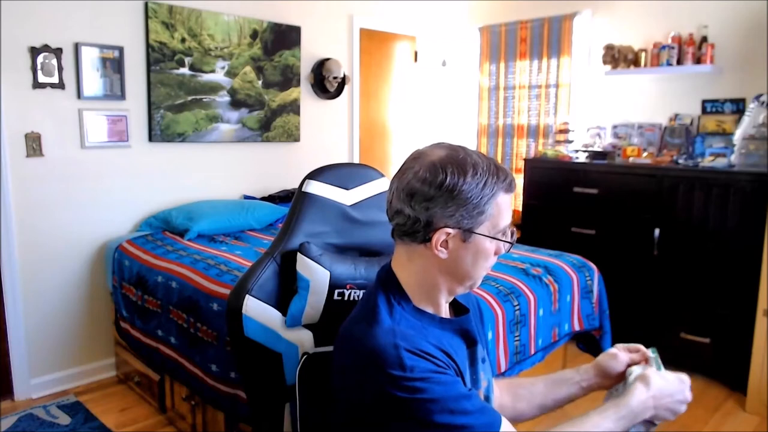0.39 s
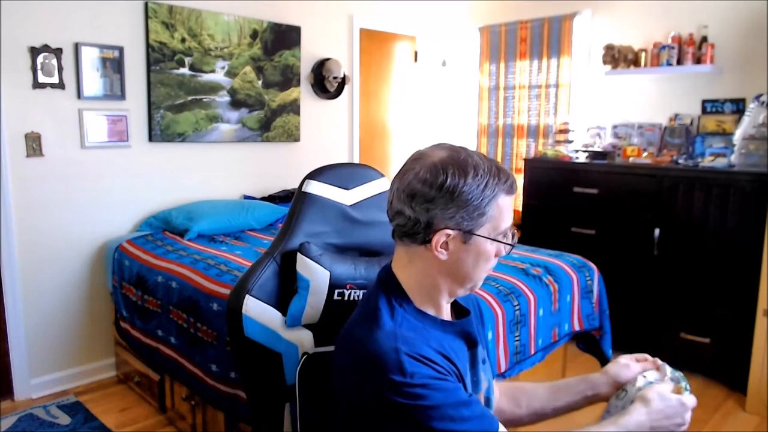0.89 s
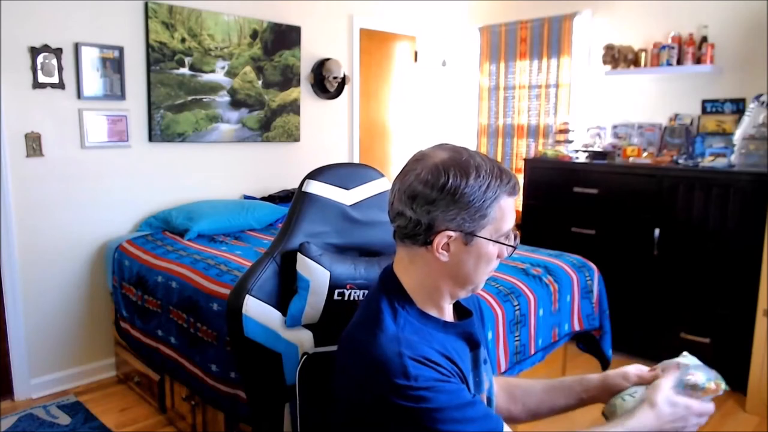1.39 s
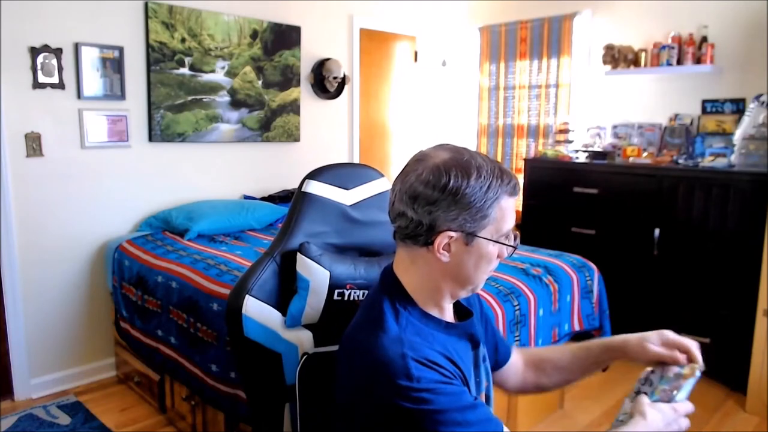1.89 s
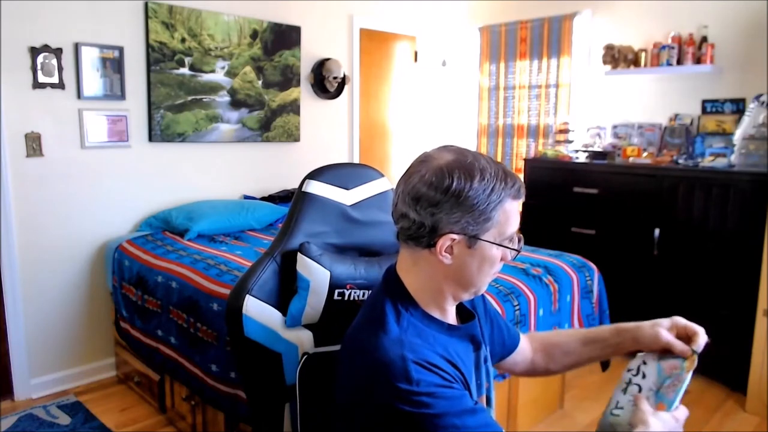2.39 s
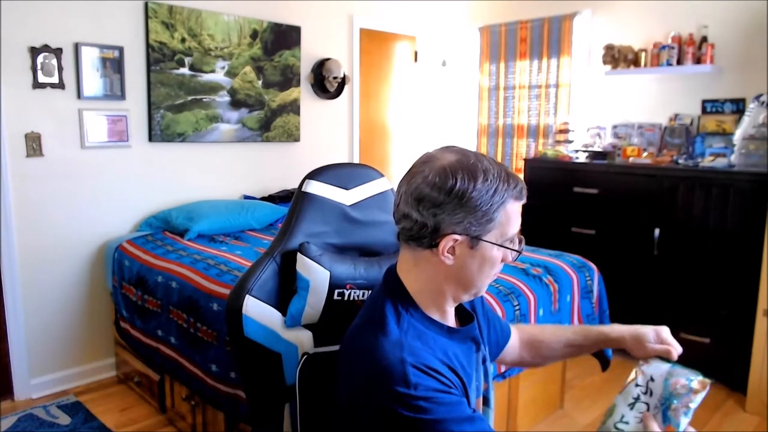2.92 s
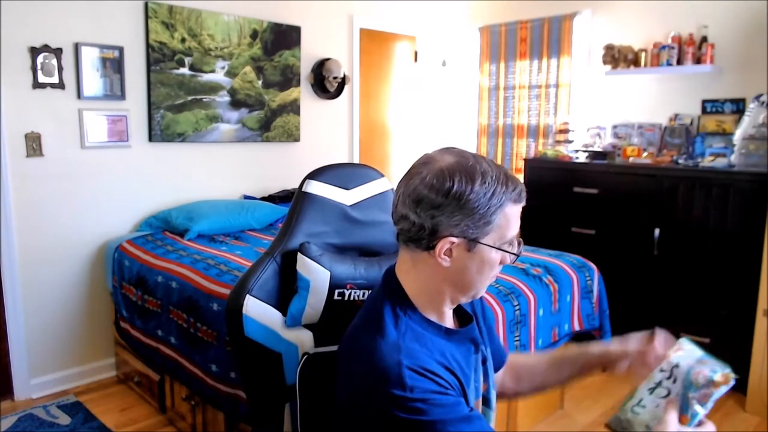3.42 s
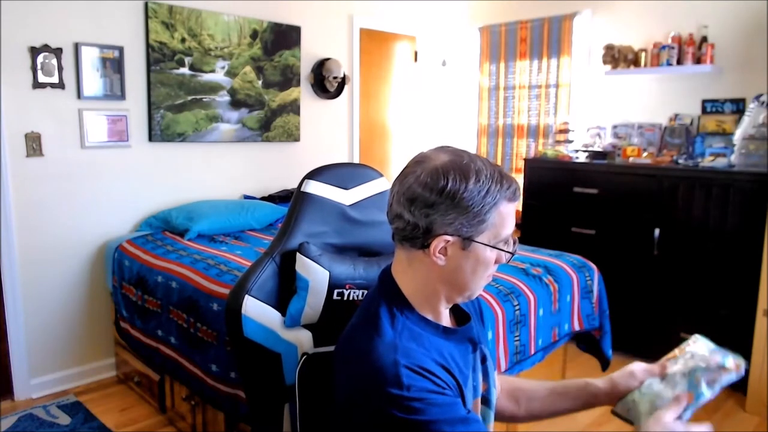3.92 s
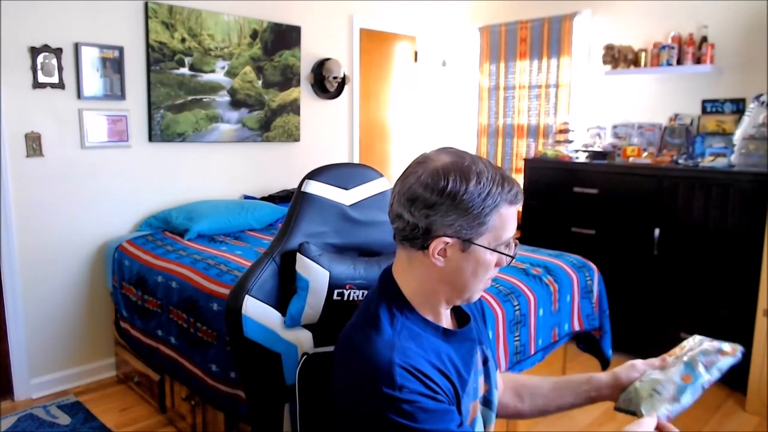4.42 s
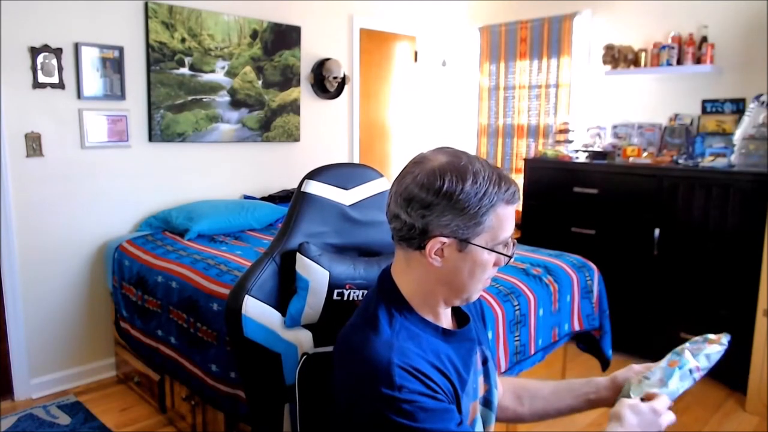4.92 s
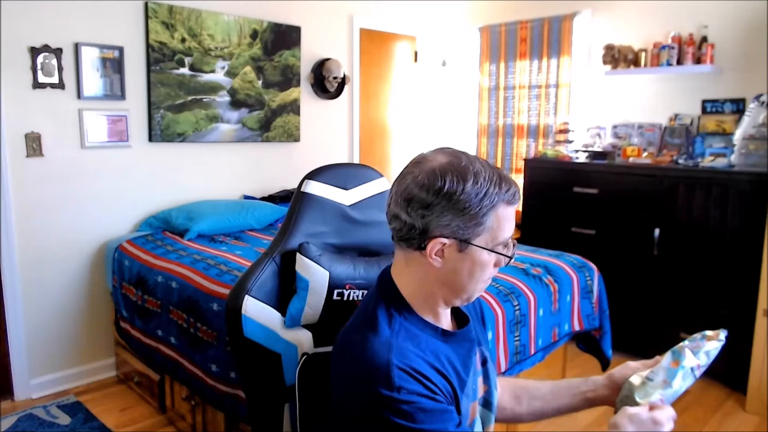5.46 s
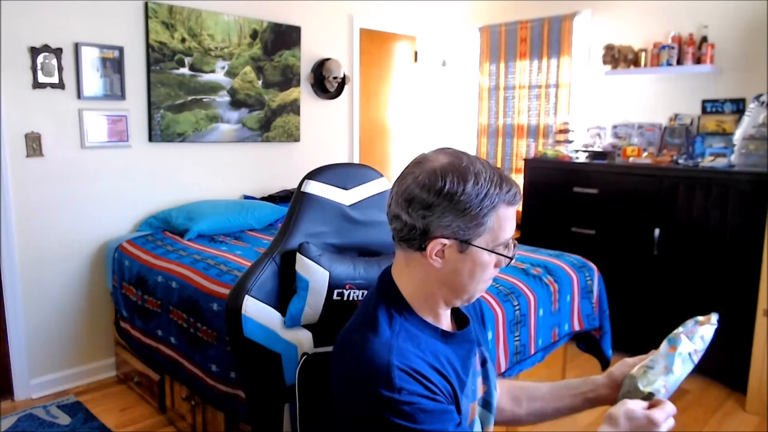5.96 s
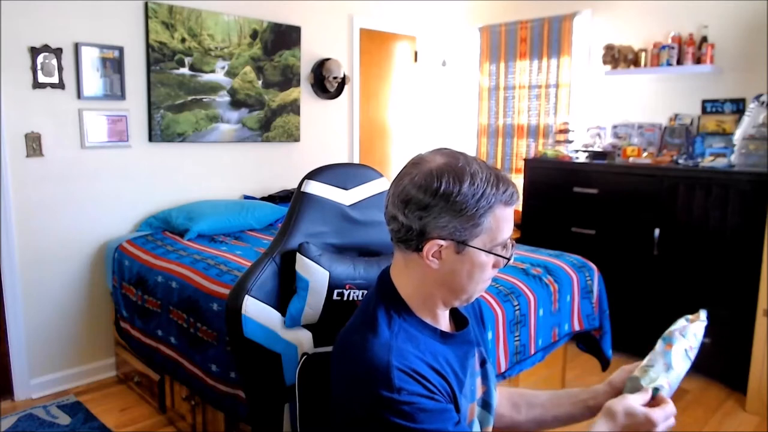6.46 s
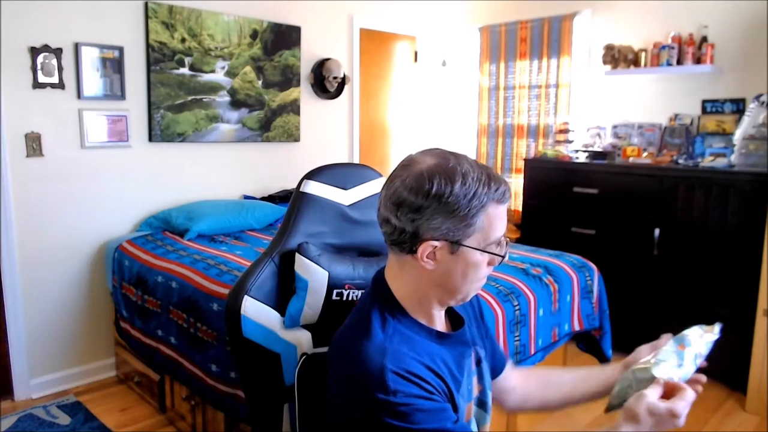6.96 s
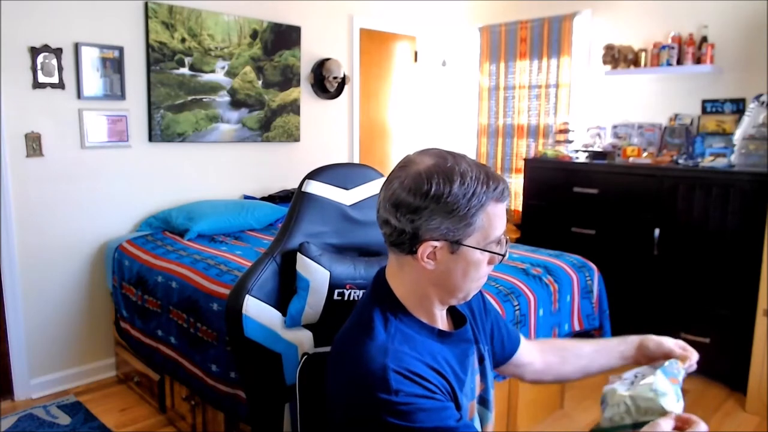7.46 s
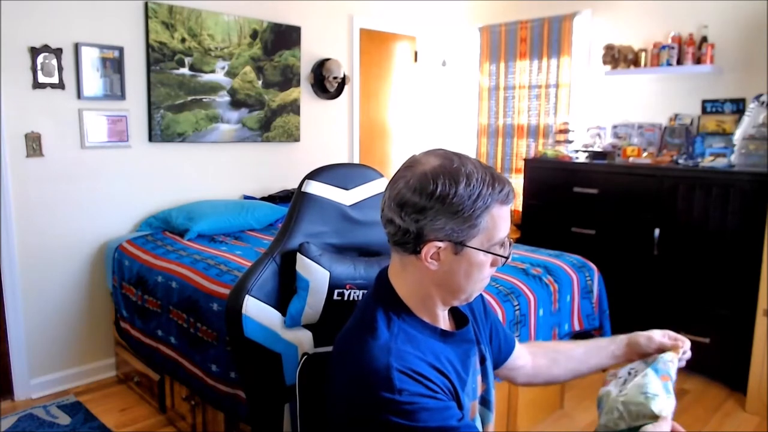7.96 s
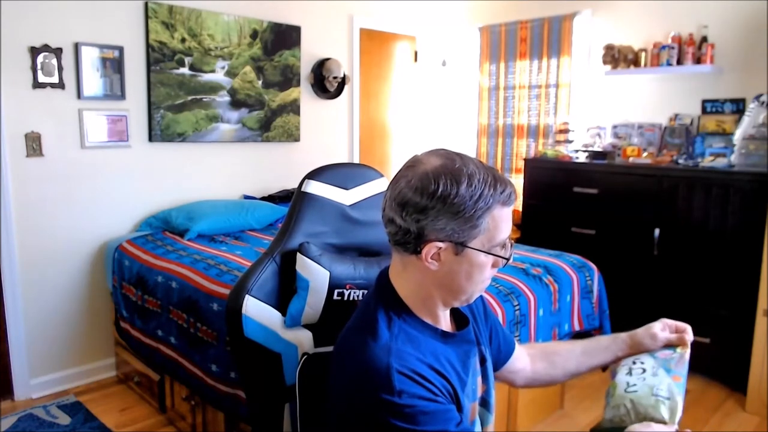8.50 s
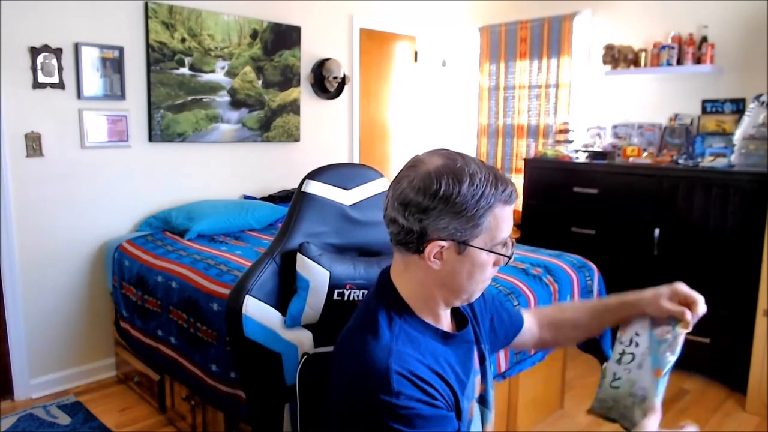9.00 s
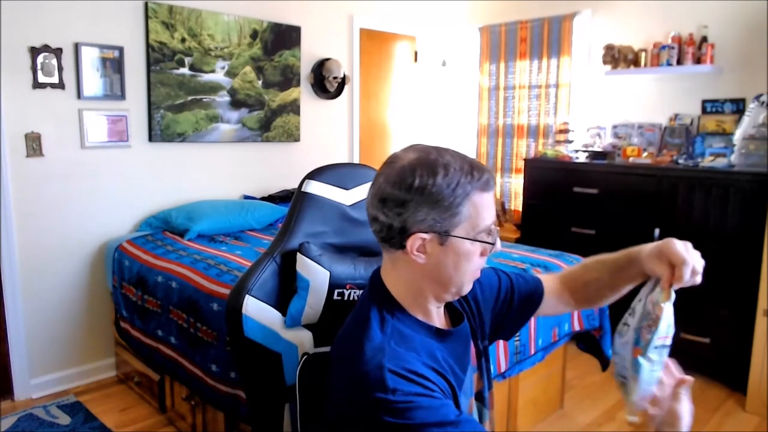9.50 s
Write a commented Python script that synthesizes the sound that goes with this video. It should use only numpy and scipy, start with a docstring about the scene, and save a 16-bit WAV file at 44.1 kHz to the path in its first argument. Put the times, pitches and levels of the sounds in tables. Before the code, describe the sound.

Hands squeeze and turn a crinkly plastic-foil bag in a small bedroom, loud crisp pops standing out of continuous fine crackling.

```python
"""Sealed foil snack bag, kneaded and turned by hands at arm's length from one microphone, small furnished bedroom.
Each buckling crease is a noise burst of a few milliseconds that rings its own patch of foil.
Big snaps stand out of a swarm of small creases, which swells with each squeeze of the fingers.
Behind them the room answers with early echoes and a short tail.
A noise suppressor fades whatever is faint, the bass first; both channels carry the same sound."""
import sys
import numpy as np
from scipy import signal
from scipy.fft import rfft, irfft
from scipy.io import wavfile
from scipy.ndimage import uniform_filter1d

SR = 44100
rng = np.random.default_rng(int(sys.argv[2]) if len(sys.argv) > 2 else 0)


def voltage_ratio(decibels):
    """Convert decibels (scalar or array-like) to amplitude ratios, 20 dB per decade."""
    exponent = np.asarray(decibels, float) / 20
    return 10 ** exponent


def store_wav(level_fs):
    """Save 16-bit WAV to argv[1]."""
    pcm = np.round(np.clip(np.atleast_2d(level_fs), -1, 1) * 32767)
    wavfile.write(sys.argv[1], SR, pcm.T.astype(np.int16))


N = 424241  # samples in the scene

# Big creases buckling close to the microphone, before the colour of the foil:
# (t/s, nominal peak level/dB, ring of the foil patch f/Hz,
#  nominal bass level re peak/dB, nominal treble level re peak/dB)
BIG_CREASES = [(0.02, -21, 832, -21, -36), (0.057, -8, 810, -30.5, -15), (0.146, -15.5, 4930, -53, -1),
               (0.244, -7.5, 3800, -38, -19), (0.273, -12, 800, -22, -52), (0.37, -9, 4000, -28, -21),
               (0.462, -19.5, 2000, -25, -2), (0.537, -9.5, 894, -27.5, -12),
               (0.594, -12, 1940, -21, -11.5), (0.786, -9, 680, -30, -21), (0.793, -20, 2470, -28, -25),
               (0.833, -8.5, 829, -26.5, -24), (0.908, -20.5, 1930, -37, -45),
               (0.943, -26.5, 2280, -44, -36), (0.957, -5.5, 780, -33.5, -39),
               (0.982, -8.5, 1140, -37, -34), (1.016, -10, 1120, -20, -32), (1.03, -3.5, 820, -29.5, -25),
               (1.084, -11.5, 1210, -47, -46), (1.16, -6, 3310, -27, -19.5), (1.236, -4, 5500, -26, -7),
               (1.267, -8, 7270, -30, -25), (1.319, -11.5, 1230, -24, -28), (1.441, -17.5, 1950, -13, -16),
               (1.571, -17, 832, -20, -21), (1.621, -12.5, 1420, -26, -35), (1.632, -9, 1790, -30, -22),
               (1.67, -12, 1520, -28, -35), (1.766, -16, 790, -30.5, -25), (1.815, -17.5, 8900, -42, -14),
               (1.879, -17, 3350, -35, -12), (1.909, -13, 1290, -33.5, -25.5), (2.002, -18, 1130, -27, -26),
               (2.036, -7, 1310, -41.5, -15), (2.068, -15.5, 3660, -21, -13.5),
               (2.132, -16.5, 740, -18.5, -19), (2.163, -11.5, 3000, -30, -18), (2.189, -9, 3700, -25, -35),
               (2.229, -1.5, 1220, -20, -36), (2.244, -5, 600, -18.5, -27), (2.312, -9, 3320, -11.5, -50),
               (2.333, -3, 4370, -33, -39), (2.352, -15, 895, -45, -8), (2.447, -10.5, 850, -29, -42),
               (2.458, -3.5, 2150, -40.5, -24), (2.478, -3.5, 3140, -39, -13.5),
               (2.573, -11.5, 1860, -40, -12), (2.604, -8, 2640, -35, -27.5), (2.763, -22, 1980, -26, -4.5),
               (2.796, -8, 1950, -35.5, -33), (2.876, -16.5, 4860, -9, -30), (2.89, -0.5, 826, -25, -17),
               (2.921, -5.5, 883, -33, -37.5), (3.021, -1.5, 3000, -25.5, -22.5),
               (3.09, -11.5, 850, -22.5, -65.5), (3.11, -19, 1370, -18.5, -27),
               (3.122, -22, 1000, -20, -44), (3.218, -23, 3000, -43, -31), (3.236, -8.5, 3000, -56, -25),
               (3.252, -9, 6820, -85, -22), (3.278, -12.5, 3030, -30, -47), (3.309, -7, 2980, -35, -17.5),
               (3.395, -15, 2500, -33.5, -47), (3.419, -14, 1960, -36, -27),
               (3.477, -6, 1710, -36.5, -24.5), (3.511, -16, 4500, -40, -34), (3.606, -13, 1420, -28, -23),
               (3.618, -11, 1860, -66, -29), (3.679, -14.5, 770, -30, -41), (3.706, -9.5, 2650, -38, -21),
               (3.727, -23.5, 2920, -13, -5), (3.771, -1.5, 1200, -49, -37.5), (3.969, -34, 2200, -40, -28),
               (3.988, -9.5, 1560, -41, -37), (4.039, -21, 3000, -19, -29), (4.047, -15.5, 2000, -28, -37),
               (4.077, -13, 850, -33, -26), (4.089, -12.5, 850, -35.5, -19), (4.2, -23, 2910, -52, -25),
               (4.219, -28, 1500, -45, -30), (4.296, -12.5, 1840, -30, -17), (4.41, -20, 3060, -40, -30),
               (4.46, -10.5, 7000, -77, -11), (4.563, -8, 3000, -37, -15), (4.657, -18, 2680, -43, -12),
               (4.667, -10, 2840, -33, -11), (4.875, -15.5, 1540, -58, -53),
               (4.894, -7.5, 4700, -70, -16.5), (5.001, -9, 1080, -34.5, -33),
               (5.064, -7.5, 1520, -39, -33), (5.087, -18, 3000, -28, -22), (5.132, -19, 7600, -28, -6),
               (5.184, -11.5, 2960, -30.5, -23), (5.236, -6, 3050, -101, -32), (5.28, -14, 3380, -48, -24),
               (5.348, -18.5, 6680, -52, -11), (5.364, -14, 1380, -75, -15), (5.449, -17, 3100, -32.5, -16),
               (5.486, -4, 2000, -36, -21), (5.574, -2.5, 1430, -49, -20.5),
               (5.649, -12, 800, -32.5, -65.5), (5.725, -20, 3170, -38, -18),
               (5.768, -12.5, 1250, -32, -25), (5.835, -13, 2020, -24, -38.5), (5.931, -13, 1480, -24, -34),
               (5.949, -12, 1950, -26, -16), (5.994, -3, 1680, -32, -25.5), (6.232, -11, 3730, -38, -10),
               (6.271, -21, 1980, -56, -6), (6.293, -17, 3530, -60, -13), (6.41, -21.5, 1120, -51, -31),
               (6.501, -17, 2260, -36, -49), (6.547, -10.5, 5260, -66, -9), (6.644, -7, 3400, -28, -12),
               (6.682, -7.5, 1900, -62, -24), (6.755, -15, 1500, -29, -23), (6.787, -12.5, 1500, -38, -37),
               (6.826, -9.5, 1810, -32, -45), (6.841, -6.5, 1700, -33, -23.5), (6.914, -10, 1930, -32, -21),
               (7.079, -22, 1200, -22, -49), (7.129, -10.5, 6500, -55, -21), (7.135, -9.5, 2040, -27, -18),
               (7.238, -12.5, 1600, -25, -26.5), (7.29, -18.5, 1540, -34, -49),
               (7.382, -19.5, 1060, -19, -39), (7.411, -16, 1110, -18, -23), (7.424, -20, 3500, -35, -13),
               (7.469, -13, 4000, -42, -10.5), (7.542, -18.5, 1390, -45, -22), (7.593, -12, 2380, -60, -15),
               (7.666, -15.5, 1370, -33, -27), (7.794, -16, 4150, -78, -17),
               (7.808, -10.5, 1800, -101, -16), (7.83, -12.5, 8200, -77, -3), (7.835, -10, 4470, -60, -51),
               (7.908, -9, 6370, -29, -18), (7.938, -6, 1840, -31, -38), (7.998, -12.5, 1910, -31.5, -19),
               (8.014, -10, 960, -29, -22.5), (8.129, -17.5, 1840, -47, -47), (8.169, -14, 824, -27, -32),
               (8.189, -15, 1250, -25, -26), (8.241, -12, 1130, -37, -47), (8.27, -6, 3350, -70, -23),
               (8.411, -5.5, 960, -42, -31), (8.435, -5.5, 2660, -52, -31), (8.467, -9, 1240, -45, -37),
               (8.561, -8.5, 1180, -25.5, -42), (8.659, -10.5, 1270, -31, -23),
               (8.685, -17.5, 1690, -29, -48), (8.765, -16, 3340, -64, -14), (8.782, -17.5, 3260, -35, -14),
               (8.834, -10.5, 2260, -33, -31), (8.849, -9.5, 1380, -38, -57), (8.882, -10, 1190, -31, -39),
               (8.89, -14, 4000, -43, -31), (8.91, -5.5, 1180, -39, -11.5), (8.918, -3, 1360, -71, -33),
               (9.015, -10.5, 1470, -54, -49), (9.03, -21, 1420, -60, -19), (9.085, -15.5, 3200, -61, -13),
               (9.099, -16, 5220, -59, -21), (9.121, -16.5, 2160, -51, -51), (9.295, -37, 9000, -41, -2),
               (9.358, -26, 1780, -25, -20), (9.38, -17.5, 3000, -47, -30), (9.388, -16, 5400, -56, -8),
               (9.464, -20, 2680, -71, -23), (9.543, -20, 6290, -61, -25), (9.561, -23, 1190, -45, -37)]


def snaps():
    """The big creases, each sounding about a millisecond after its listed time; small bright patches snap
    quicker, a full belly of air makes them deeper."""
    lag_numerator, lag_denominator = 0.35, 343
    plain_bass_db, plain_treble_db = -27.5, -25.5  # re peak, for a crease in flat foil
    snap_ms, log_spread = 2.4, 0.25  # time scale at a 2 kHz ring, scatter of its logarithm
    s, db, ring_hz, bass_db, treble_db = np.transpose(BIG_CREASES)
    luck = np.exp(log_spread * rng.standard_normal(len(s)))
    length_ms = snap_ms * (2000 / ring_hz) ** 0.3 * luck
    sounding_s = s + lag_numerator / lag_denominator
    belly_db = bass_db - plain_bass_db
    crisp_db = treble_db - plain_treble_db
    return creases(sounding_s, db, length_ms, ring_hz, belly_db, crisp_db, ring_db=8, patchy_db=4.5)


def swarm():
    """Small creases at random moments: many faint, a few strong, going off in avalanches."""
    creases_per_s = 700
    count = int(creases_per_s * N / SR)
    luck = rng.random((count, 4))
    s = luck[:, 0] * (N - 1) / SR
    db, belly_db, crisp_db = kneading(s)
    # a light touch gives lone ticks, full force an even crush
    uneven = np.clip(1.4 - (db + 42) / 25, 0.6, 1.4)
    size_db = uneven * np.minimum(-3.8 * np.log(1 - luck[:, 1]), 11)
    # avalanches of 25 ms share a patch of foil, its approximate ring and its strength
    avalanche = rng.random((400, 2))[(s * 40).astype(int)]
    db = db + 7.7 * (avalanche[:, 0] - 0.5)
    ring_hz = 700 * 2 ** (2.46 * avalanche[:, 1] + luck[:, 3])
    length_ms = 0.46 + 3.2 * luck[:, 2] ** 3
    return creases(s, db + size_db, length_ms, ring_hz, belly_db, crisp_db, ring_db=6.5, patchy_db=2.0)


# Squeezes of the fingers on the bag:
# (t of full force/s, nominal peak level of the faintest creases/dB, t held/s, belly level/dB)
FINGER_SQUEEZES = [(0.0, -29, 0.006, 1), (0.161, -23, 0.06, -1), (0.24, -19, 0.025, -14),
                   (0.39, -24, 0.014, -18), (0.46, -30.5, 0.021, -2), (0.55, -24.5, 0.073, -10.5),
                   (0.7, -28, 0.086, -3), (0.8, -30, 0.018, -21), (0.987, -16.5, 0.02, -8),
                   (1.165, -29, .04, -7), (1.232, -21.5, 0.079, -7), (1.6, -39, 0.033, -8),
                   (1.85, -33, 0.048, 1), (2.238, -16, 0.0086, -5), (2.46, -34.5, 0.2, -0.5),
                   (2.78, -21.5, 0.046, -11), (2.885, -19, 0.0088, 2), (3.03, -30, 0.076, -9),
                   (3.24, -47.5, 0.19, 27), (3.6, -33, 0.12, -3), (3.751, -28.5, 0.12, -1),
                   (4.08, -34.5, 0.0062, -5), (4.3, -36, 0.009, -5), (4.46, -31, 0.0087, -4),
                   (4.657, -35, 0.0054, -1), (4.88, -39, 0.056, -12), (5.015, -32, 0.063, -18),
                   (5.2, -30, 0.054, -3), (5.49, -38, 0.49, -7), (5.96, -36, 0.06, -27),
                   (6.228, -40.5, 0.054, 2), (6.663, -20.5, 0.02, -6), (6.83, -26.5, 0.068, -12),
                   (7.14, -34.5, 0.044, 1), (7.42, -36.5, 0.066, -17), (7.83, -37, 0.2, 2.5),
                   (7.95, -35, 0.026, -19), (8.143, -28.5, 0.069, 5), (8.28, -21.5, 0.036, -1.5),
                   (8.43, -25, 0.097, -3.5), (8.67, -35, 0.012, -4), (8.85, -32, 0.095, -1),
                   (9.05, -38.5, 0.1, -14), (9.291, -42.5, 0.023, -29), (9.365, -36.5, 0.011, -1),
                   (9.48, -40, 0.031, -19), (9.53, -37.5, 0.018, 4)]
# The bag resting in the hands: (t/s, nominal peak level of the faintest creases/dB)
RESTING_GRIP = [(0, -46.5), (1.4, -30.5), (2.1, -40.5), (3.4, -41), (4.2, -43), (5.3, -40.5), (6.1, -46.5),
                (6.5, -34), (7.0, -41.5), (7.6, -42.5), (8.1, -42.5), (9.1, -48), (9.17, -68), (9.23, -77),
                (9.33, -70), (9.62, -55)]


def kneading(s):
    """Level, belly and crispness at moments s: squeezes build fast, hold and let go over the resting grip."""
    rise_db_per_s, release_db_per_s = 450, 120.5
    slack_belly_db = -4  # slack foil has little belly
    crisp_db_per_db = 0.0246  # firmer force is crisper
    full, peak_db, held, belly_db = np.transpose(FINGER_SQUEEZES)[:, :, None]
    building_s = np.maximum(full - s, 0)
    released_s = np.maximum(s - full - held, 0)
    db = peak_db - rise_db_per_s * building_s - release_db_per_s * released_s
    grip_db = np.interp(s, *np.transpose(RESTING_GRIP))
    power, rest = voltage_ratio(db) ** 2, voltage_ratio(grip_db) ** 2
    total = power.sum(axis=0) + rest
    level_db = 10 * np.log10(total)
    mean_belly_db = ((power * belly_db).sum(axis=0) + rest * slack_belly_db) / total
    crisp_db = crisp_db_per_db * (level_db - grip_db) + 7.5
    return level_db, mean_belly_db, crisp_db


def creases(s, db, length_ms, ring_hz, belly_db, crisp_db, ring_db, patchy_db):
    """One noise burst a crease, ringing its own patch of foil: rows (toward the microphone, toward the walls)."""
    grain = 1024  # samples a burst
    belly_low_hz = 126  # a boost by the air in the bag fades out below this
    x = np.arange(grain) / SR * 1000 / length_ms[:, None]
    hz = np.fft.rfftfreq(grain, 1 / SR)
    luck = rng.standard_normal((len(s), grain + 16))
    shape = np.sqrt(x) * (np.exp(-2.2 * x ** 2) + 0.5 * np.exp(-x))
    shape = shape + 1.3 * np.exp(-x / 0.08)  # the crease gives way with a needle-sharp tick

    low = 1 / (1 + (hz / 650) ** 4)
    # a soft, dull buckle loses its treble from lower down
    edge_hz = 8500 * voltage_ratio(0.4 * np.minimum(crisp_db + 12, 0))[:, None]
    high = 1 / (1 + (edge_hz / (hz + 1)) ** 4)

    # chance peaks and dips along the spectrum, different for each patch
    place = np.sqrt(hz / hz[-1]) * 16 - np.arange(16)[:, None]
    peaks = luck[:, :16] @ np.exp(-0.5 * place ** 2 / 0.084)
    patch = causal(patchy_db * peaks * (1 - low))
    octaves_off = np.log2((hz + 1) / ring_hz[:, None])
    ring = causal(ring_db * np.exp(-0.5 * (octaves_off / 0.2) ** 2))
    belly = belly_db[:, None]
    belly_limit = 1.5 + (belly > 0) * (belly_low_hz / (hz + 1)) ** 4
    tone = causal(np.minimum(belly, 30) * low / belly_limit + crisp_db[:, None] * high)

    burst = rfft(luck[:, 16:] * shape)
    # a sudden buckle spreads its energy evenly, so the ring of the patch stands out
    spread = uniform_filter1d(np.abs(burst), size=9, axis=1)
    burst = burst * np.sqrt(spread.mean(axis=1, keepdims=True) / spread) * ring
    # the level is set on the burst without its treble
    loud = np.abs(irfft(burst * patch * (1 - high))).max(axis=1)
    # the walls hear the crease from all sides, which evens out its chance peaks
    strength = np.sqrt((shape ** 2).sum(axis=1, keepdims=True))
    sign = np.sign(luck[:, -1:])
    around = strength * sign * np.sqrt(patch) * np.sqrt(ring)
    gain = tone * (voltage_ratio(db) / loud)[:, None]
    waves = irfft(np.stack([burst * patch, around], axis=1) * gain[:, None])
    out = np.zeros((2, N + grain))
    for start, wave in zip((s * SR).astype(int), waves):
        out[:, start:start + grain] += wave
    return out[:, :N]


# Colour that the foil gives every crease: (f/Hz, level/dB)
FOIL_COLOUR = [(25, -5), (100, -9.5), (160, -7.5), (500, -4), (850, -2.5), (7300, -6.5), (11000, -15),
               (15000, -20.5), (16500, -50)]


def foil(bursts):
    """The foil filters all creases alike, with a minimum-phase response."""
    hz = np.fft.rfftfreq(4096, 1 / SR)
    colour = irfft(causal(on_hz(FOIL_COLOUR, hz)))
    return signal.fftconvolve(bursts, colour[None], axes=1)[:, :N]


# Low modes of the bedroom: (nominal f/Hz, nominal level re tail/dB)
BEDROOM_MODES = [(168, -19.5), (375, -17), (540, -24), (680, -25), (820, -17), (880, -23), (1170, -18.5)]
# Echoes of the nearest walls: (nominal t late/s, level/dB)
WALL_ECHOES = [(.008, -19), (.017, -21)]
# Time in which the tail falls by 60 dB: (f/Hz, t/s)
DECAY_TIMES = [(200, 0.19), (3000, 0.26), (15000, 0.22)]


def room():
    """Echoes of the first walls, then a diffuse tail that favours a few low modes, each met with new strength."""
    tail_db, tilt_db = -28.5, -0.5  # level of the tail, its slope an octave above 2 kHz
    mode_drift = 0.04  # scatter of each mode's pitch as the bag moves, as a share
    t = np.arange(int(0.4 * SR)) / SR
    hz = np.fft.rfftfreq(len(t), 1 / SR)
    air = rfft(rng.standard_normal(len(t)))
    tail = 0
    for centre in 100 * 2. ** np.arange(8):
        band = np.clip(1 - np.abs(np.log2(np.maximum(hz, 1) / centre)), 0, 1)
        start_db = tilt_db * max(np.log2(centre / 2000), 0)
        decay_db = 60 * t / on_hz(DECAY_TIMES, centre)
        tail = tail + irfft(air * band, len(t)) * voltage_ratio(start_db - decay_db)
    for f, db in BEDROOM_MODES:
        strength = voltage_ratio(db) * rng.uniform(0.3, 1.5)
        mode_hz = f * (1 + mode_drift * rng.standard_normal())
        tail = tail + strength * np.sin(2 * np.pi * mode_hz * t) * np.exp(-t / 0.03)
    tail = voltage_ratio(tail_db) * tail * np.clip(t / 0.008, 0, 1)  # builds up over 8 ms
    for late, db in WALL_ECHOES:
        tail[int(late * SR * rng.uniform(0.9, 1.1))] += voltage_ratio(db)
    return tail


def on_hz(table, hz):
    """Read a (Hz, value) table on a log-frequency axis."""
    f, v = np.transpose(table)
    return np.interp(np.log(np.maximum(hz, 1)), np.log(f), v)


def causal(db):
    """Minimum-phase response for rows of dB gains: nothing rings before the blow."""
    c = irfft(db * np.log(10) / 20)
    half = c.shape[-1] // 2
    fold = np.r_[1, 2 * np.ones(half - 1), 1, np.zeros(half - 1)]
    return np.exp(rfft(c * fold))


def scene():
    """Bag, coloured by the foil, in the room; one microphone feeds both channels."""
    near, around = foil(snaps() + swarm())
    # the bag keeps moving, so every tenth of a second meets the walls by other paths
    hop = SR // 10
    sound = np.r_[near, np.zeros(SR)]
    for start in range(0, N, hop):
        echo = signal.fftconvolve(around[start:start + hop], room())
        sound[start:start + len(echo)] += echo
    return np.tile(sound[:N], (2, 1))


# Below this level the suppressor takes a band for noise: (f/Hz, level/dB)
NOISE_LEVELS = [(60, -58), (400, -62), (1500, -64.5), (8000, -66)]


def suppressor(sound):
    """Turns down every narrow band whose recent level sinks toward or under a set noise level."""
    hz, _, z = signal.stft(sound, SR, nperseg=1024, noverlap=768)
    power = np.abs(z) ** 2
    # above 1.2 kHz neighbouring bands are judged together
    power = np.where(hz[:, None] > 1200, uniform_filter1d(power, size=5, axis=1), power)
    # it opens at once and closes slowly, so lone bands ring on in the quiet
    power = np.maximum(power, signal.lfilter([0.2], [1, -0.8], power, axis=2))
    noise = voltage_ratio(on_hz(NOISE_LEVELS, hz))[:, None] ** 2
    gain = np.maximum((power / (power + noise)) ** 2, voltage_ratio(-26))  # at most 26 dB down
    return signal.istft(z * gain, SR, nperseg=1024, noverlap=768)[1][:, :N]


def band_limit(x):
    """A steep low-pass at the top of the band."""
    return signal.sosfilt(signal.butter(12, 16650, fs=SR, output="sos"), x)


def record(dry):
    """The microphone signal passes the noise suppressor on its way to the finished mix."""
    mix = suppressor(dry)
    return band_limit(mix)


dry = scene()
out = record(dry)
store_wav(out)
```